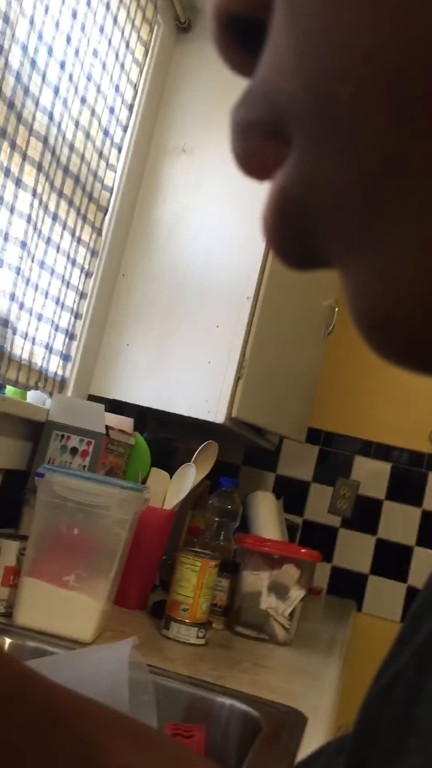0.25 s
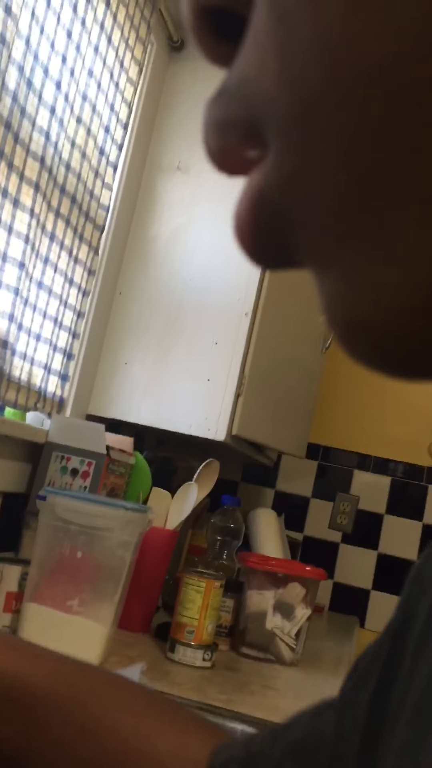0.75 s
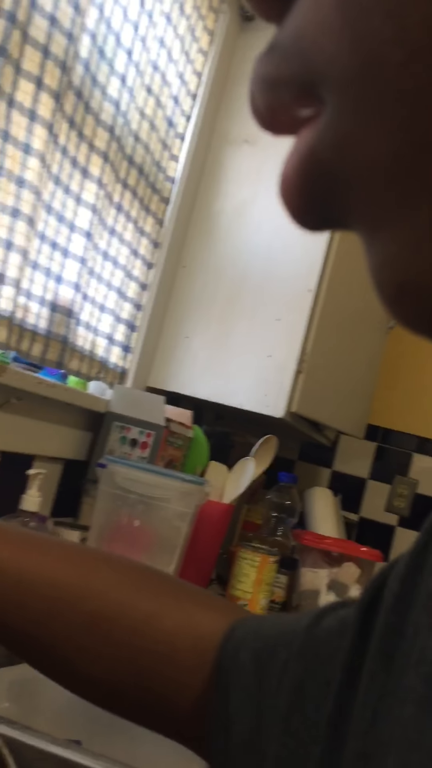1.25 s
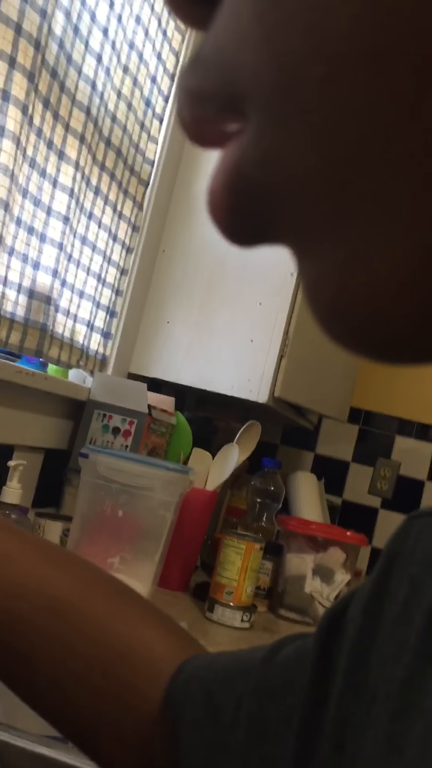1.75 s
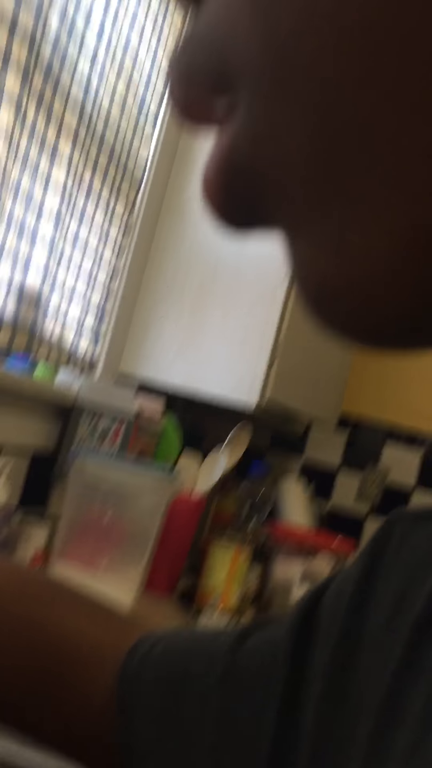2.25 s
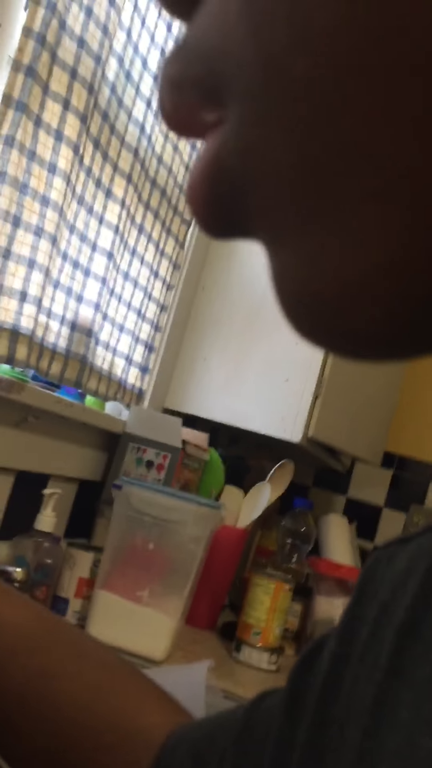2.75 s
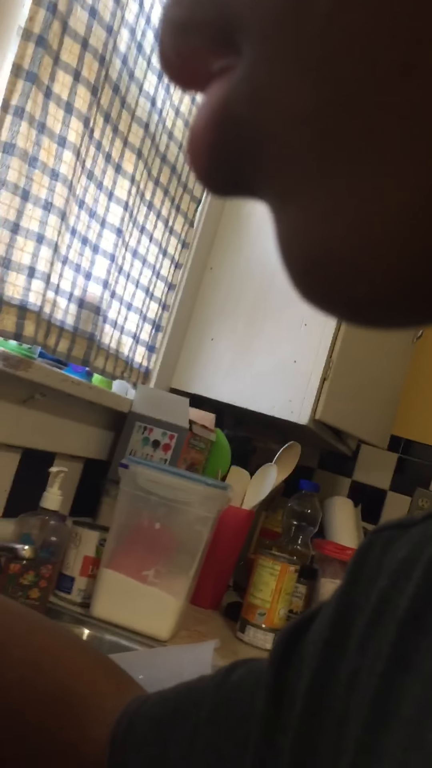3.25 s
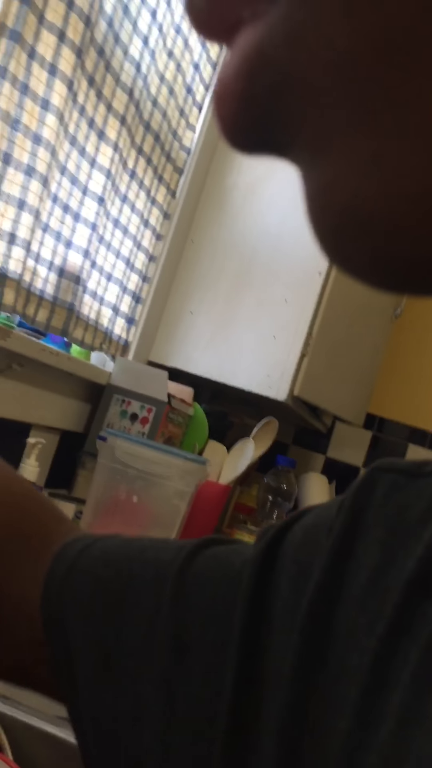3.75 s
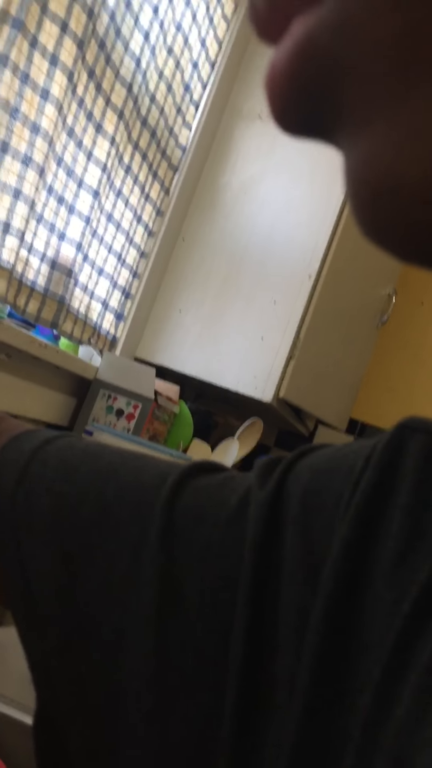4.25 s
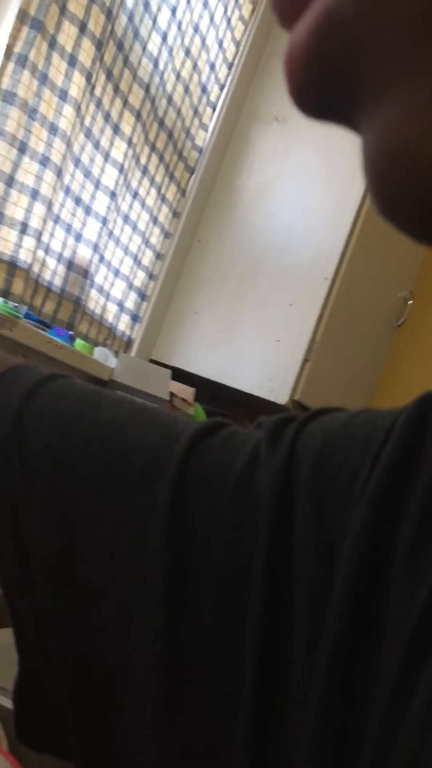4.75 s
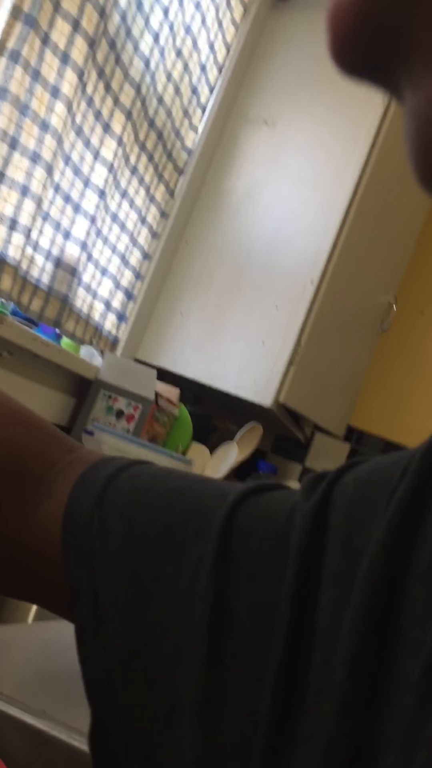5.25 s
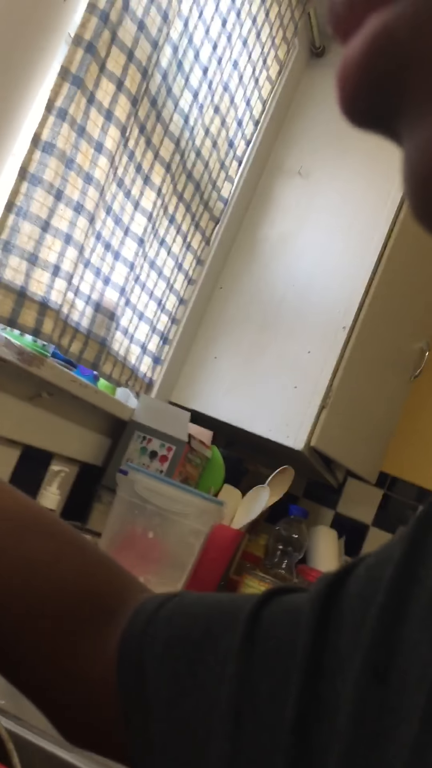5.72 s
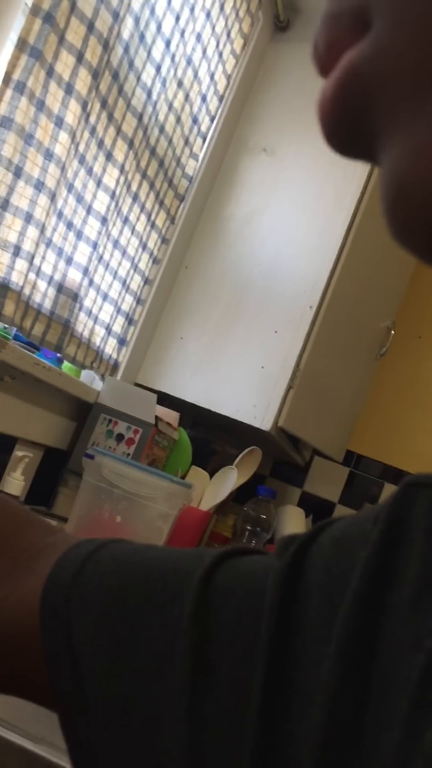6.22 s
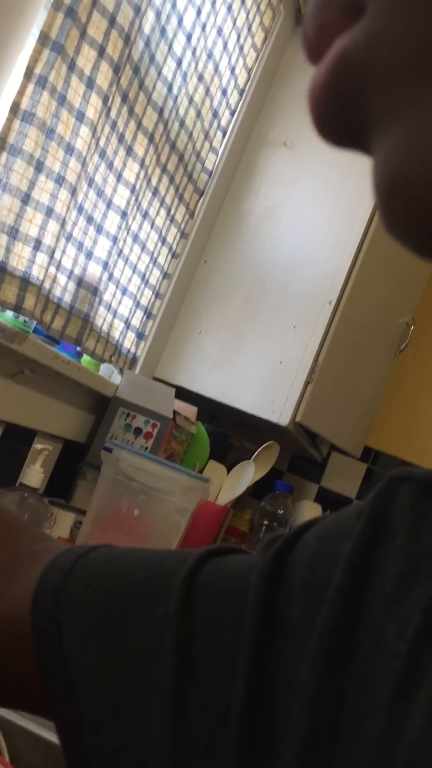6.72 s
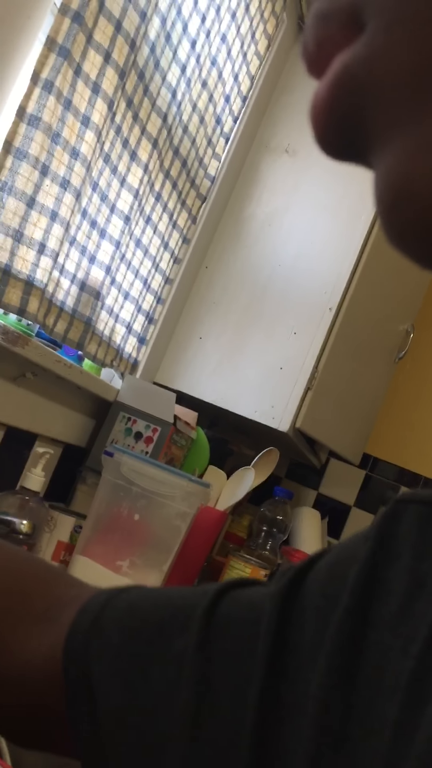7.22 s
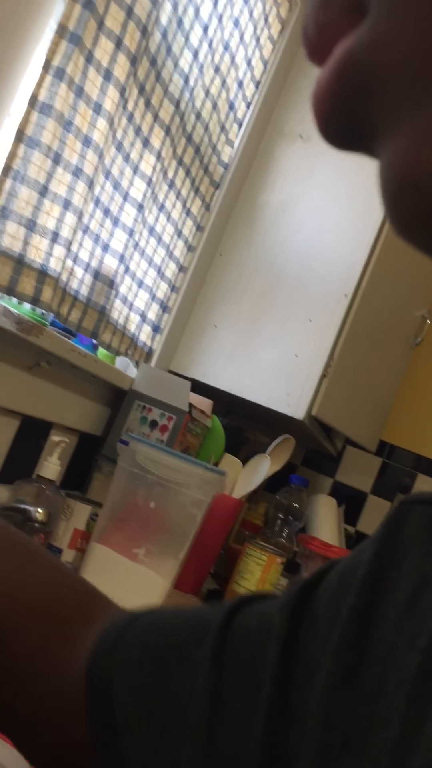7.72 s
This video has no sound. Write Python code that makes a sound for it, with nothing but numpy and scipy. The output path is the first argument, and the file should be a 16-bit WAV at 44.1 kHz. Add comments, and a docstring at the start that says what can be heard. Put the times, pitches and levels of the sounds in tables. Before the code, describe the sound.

Close washing-up sounds: dull taps, hollow bumps, clacks and short scrapes in a metal basin, a loud clang midway, then sparser knocks.

```python
"""At a steel kitchen sink in a small tiled kitchen, heard from close by the washer's shoulder during washing up.
Under it all lie quiet room air, deep worktop thumps, thin brushing, and low jostling with scrapes (filtered noise).
Soft bumps are low damped tones; nudges are flurries of tiny noise grains; taps and knocks are snaps with damped modes.
Clinks ring the cutlery, and one heavy piece drops into the basin, ringing the steel and clattering on it.
All but the air, the brushing, the basin's booms and the thumps gets an echo of fading noise from the kitchen."""
import sys
import numpy as np
from scipy import signal
from scipy.fft import rfft, irfft, next_fast_len
from scipy.io import wavfile
from scipy.ndimage import map_coordinates

SR = 44100
rng = np.random.default_rng(int(sys.argv[2]) if len(sys.argv) > 2 else 0)


def generate_wav(signal):
    """Clip the signal to [-1, 1] and save it as 16-bit WAV at the path in sys.argv[1]."""
    frames = np.transpose(np.atleast_2d(signal))
    scaled = np.clip(frames, -1, 1) * 32767
    pcm = np.round(scaled).astype(np.int16)
    wavfile.write(sys.argv[1], SR, pcm)


N = 351697  # length of the scene [samples]


def amp(db):
    """Turn decibels into a gain."""
    return 10 ** (np.asarray(db) / 20)


def unit(x):
    """Scale x to an average strength (rms) of 1."""
    return x / np.sqrt(np.mean(x ** 2) + 1e-20)


def along(points, hz):
    """Read (frequency, value) points at hz, on a logarithmic frequency axis."""
    point_hz, value = np.transpose(points)
    return np.interp(np.log(hz + 1), np.log(point_hz), value)


def fade(t, t60):
    """A natural dying away: 60 dB down after t60 seconds."""
    return np.exp(-np.log(1000) * t / t60)


def onset(t, rise_s):
    """A quick rounded start, from 0 up towards 1."""
    return 1 - np.exp(-t / rise_s)


def add(track, s, sound):
    """Mix a sound into the track at time s, cut off at the track's end."""
    part = track[max(round(s * SR), 0):][:len(sound)]
    part += sound[:len(part)]


def colour(x, spectrum, size=4096):
    """Filter x to the given spectrum without any sound before its cause (minimum phase)."""
    gain = amp(along(spectrum, np.fft.rfftfreq(size, 1 / SR)))
    cepstrum = irfft(np.log(gain))
    # folding the second half onto the first makes the filter act only forward in time
    cepstrum[1:size // 2] *= 2
    cepstrum[size // 2 + 1:] = 0
    response = irfft(np.exp(rfft(cepstrum)))
    return signal.fftconvolve(x, response)[:len(x)]


def tilted(spectrum, slope_db):
    """Turn a spectrum about its middle point by slope_db an octave."""
    middle_hz = spectrum[len(spectrum) // 2 - 1][0]
    return [(hz, level + slope_db * np.log2(hz / middle_hz)) for hz, level in spectrum]


def wobble(rate, size=N):
    """A smooth random curve with rate random points a second."""
    points = rng.standard_normal(int(size * rate / SR) + 4)
    return map_coordinates(points, [np.arange(size) * rate / SR])


# how long the kitchen's echo lasts: (frequency [Hz], time to fall 60 dB [s])
KITCHEN = [(100, 0.38), (300, 0.19), (800, 0.16), (2000, 0.2), (5000, 0.14), (14000, 0.2)]


def in_kitchen(x, wet_db, build_s=0.00039):
    """Add a fresh room tail: noise in which each frequency dies at its own speed."""
    hz, t, noise = signal.stft(rng.standard_normal(SR // 2), SR, nperseg=256)
    decay = fade(t, along(KITCHEN, hz)[:, None])
    tail = signal.istft(noise * decay * onset(t, build_s), SR)[1]
    response = amp(wet_db) * tail / np.linalg.norm(tail)
    response[0] += 1  # the direct sound
    return signal.fftconvolve(x, response)


def contact(spectrum, snap_t60, ring_db, count, ring_t60=0.064, rise_s=0.0004):
    """One contact: a noise snap plus a cluster of damped tones, rms 1 over its first 12 ms."""
    t = np.arange(SR // 4) / SR
    spaced_hz = np.geomspace(spectrum[1][0], spectrum[-2][0], count)
    hz = spaced_hz * np.exp(rng.normal(0, .05, count))
    modes = rng.choice([-1, 1], count) @ np.sin(2 * np.pi * hz[:, None] * t)
    snap = rng.standard_normal(len(t)) * fade(t, snap_t60)
    ringing = amp(ring_db) * unit(modes) * fade(t, ring_t60)
    sound = colour((snap + ringing) * onset(t, rise_s), spectrum)
    return sound / np.sqrt(np.mean(sound[:SR // 80] ** 2))


def ring(modes, t, t60, reach_hz=np.inf):
    """Ring metal modes at slightly new strengths; a soft blow wakes little above reach_hz."""
    total = 0
    for hz, level in modes:
        strength = amp(level + rng.normal()) / (1 + (hz / reach_hz) ** 2)
        total = total + rng.choice([-1, 1]) * strength * np.sin(2 * np.pi * hz * t)
    return total * fade(t, t60)


# spectrum of the quiet room: (frequency [Hz], level [dB])
AIR = [(22, -31), (58, 9), (140, -8), (250, -0.5), (450, -14), (2700, -23.5), (16000, -34)]


def room_air():
    """The quiet of the room: steady, faint filtered noise."""
    return amp(-60) * unit(colour(rng.standard_normal(N), AIR))


# weight set down shakes the worktop: (time [s], level [dB])
THUMPS = [(4.736, -25.5), (6.099, -39), (6.766, -33.5)]


def worktop(hz=85, t60=0.19, rise_s=0.0022):
    """A short, deep thump of the worktop under the sink: low noise that dies away."""
    track, t = np.zeros(N), np.arange(SR // 3) / SR
    spectrum = [(hz / 3, -25), (hz * 0.72, 0), (hz * 2.0, 0), (hz * 3, -30), (hz * 12, -80)]
    for s, db in THUMPS:
        rumble = unit(colour(rng.standard_normal(len(t)), spectrum))
        add(track, s, amp(db - 0.5) * rumble * fade(t, t60) * onset(t, rise_s))
    return track


def slips(rate, spread_db, smooth_share):
    """Friction: about rate tiny slips a second, uneven in size, over a smooth rub, rms 1."""
    happens = rng.random(N) < rate / SR
    grains = happens * rng.standard_normal(N) * amp(spread_db * rng.standard_normal(N))
    return unit(unit(grains) + smooth_share * rng.standard_normal(N))


# light brushing: (time [s], starting level [dB], time to fall 60 dB [s])
BRUSH = [(0.033, -51.5, 0.96), (6.83, -61.5, 2.1)]
# spectrum of the brushing: (frequency [Hz], level [dB])
HISS = [(2500, -20), (5000, -13.5), (6700, -1.5), (8200, -10), (9700, -8.5), (16000, -15.5)]


def brushing(rise_s=0.002, flutter_db=3):
    """Light sliding makes a thin, fluttering hiss that starts at a touch and dies away."""
    level, t = np.zeros(N), np.arange(2 * SR) / SR
    for s, db, t60 in BRUSH:
        add(level, s, amp(db) * fade(t, t60) * onset(t, rise_s))
    flutter = amp(flutter_db * wobble(26))
    return level * flutter * unit(colour(slips(2500, 2.7, 1.0), HISS))


# spectrum of scraping on a dish: (frequency [Hz], level [dB])
SCRAPE = [(500, -28.5), (1000, 0), (1450, -2.5), (1950, 7.5), (3200, -2), (4250, -1.5), (4900, -12),
          (5600, -5), (9000, -12), (16000, -29)]
# ringing tones of the cutlery: (frequency [Hz], level [dB])
CUTLERY = [(4110, -5.5), (5440, -4), (6780, -2), (7150, -9), (8442, -7)]
CUTLERY_T60 = 0.25  # time to fall 60 dB [s]


def dish(x, t60=0.052, ring_db=-2, cutlery_db=-12, drift=.018, grips_per_s=6, count=140):
    """A rub rings the close tones of a dish and its cutlery, which glide as the grip changes."""
    t = np.arange(SR // 6) / SR
    hz = rng.uniform(SCRAPE[1][0], SCRAPE[-3][0], (count, 1))
    plate = rng.standard_normal(count) @ np.sin(2 * np.pi * hz * t) * fade(t, t60)
    metal = ring(CUTLERY, t, CUTLERY_T60)
    response = amp(ring_db) * plate / np.linalg.norm(plate)
    response += amp(cutlery_db) * metal / np.linalg.norm(metal)
    response[0] += 1  # the rub is also heard directly
    when = np.arange(len(x)) * grips_per_s / SR
    grip = map_coordinates(rng.standard_normal(12), [when], mode="mirror")
    speed = 1 + drift * grip  # reading faster or slower makes the pitch glide
    return map_coordinates(signal.fftconvolve(x, response), [np.cumsum(speed)])


def arch(size, swell):
    """A hand movement swells and fades; a small swell makes it squarer."""
    return np.hanning(size) ** abs(swell)


def pressure(slow_db, fast_db):
    """The gain of a hand that leans in and lets go, sticks and slips."""
    return amp(slow_db * wobble(13) + fast_db * wobble(45))


# the hollow of the jostling moves with the hands: (time [s], pitch [Hz])
HOLLOW = [(0.25, 720), (2.2, 503), (4.3, 454), (7.4, 609)]


def hollow_hz(s):
    """The pitch of the hollow where the hands are at time s."""
    return np.interp(s, *np.transpose(HOLLOW))


# bouts of handling in the basin: (start [s], end [s], jostle level [dB], scrape level [dB])
STROKES = [(0.031, 0.399, -44, -75), (0.174, 0.249, -31.5, -45.5), (0.563, 0.77, -46, -60),
           (1.028, 1.212, -41, -54.5), (1.275, 1.54, -49.5, -61.5), (2.145, 2.475, -41.5, -50.5),
           (2.476, 2.719, -45, -52.5), (2.915, 3.361, -43.5, -53), (3.401, 3.783, -47, -48),
           (3.74, 4.249, -48.5, -50.5), (4.2, 4.439, -49.5, -64), (4.48, 4.849, -45.5, -52),
           (5.121, 5.305, -39, -60), (5.378, 5.728, -50.5, -63.5), (5.923, 6.328, -53.5, -62),
           (6.648, 6.892, -45, -53.5), (7.231, 7.496, -46.5, -52.5)]
# a piece skids to rest over a dish: (time [s], starting level [dB], time to fall 60 dB [s])
SKIDS = [(1.977, -31.5, 0.39), (2.544, -33.5, 0.35), (3.38, -35, 0.31), (3.793, -41, 0.41),
         (5.04, -18, 0.52)]
# spectrum of the jostling before its pitch is moved: (frequency [Hz], level [dB])
JOSTLE = [(25, -32.5), (65, 3), (170, -3.5), (280, 5), (500, 4.5), (720, 0), (1000, -12.5), (1600, -29.5),
          (4000, -67)]


def rubbing(swell=0.13, skid_rise_s=0.0047):
    """Strokes jostle the hollow basin and scrape a dish; a skid starts at once and dies away."""
    jostling, scraping = np.zeros((2, N))
    shoves, catches = slips(240, 0.73, 0.12), slips(400, 4.1, 0.3)
    for start, end, jostle_db, scrape_db in STROKES:
        span = slice(max(round(start * SR), 0), round(end * SR))
        shift = hollow_hz(start) / JOSTLE[4][0]
        moved = [(hz * shift, db) for hz, db in JOSTLE]
        jostle = unit(colour(shoves[span], moved))
        scrape = unit(colour(dish(catches[span]), SCRAPE))
        add(jostling, start, amp(jostle_db) * arch(len(jostle), swell) * jostle)
        add(scraping, start, amp(scrape_db) * arch(len(scrape), swell) * scrape)
    t = np.arange(SR // 2) / SR
    for s, db, t60 in SKIDS:
        scrape = unit(colour(dish(rng.standard_normal(len(t))), SCRAPE))
        add(scraping, s, amp(db) * scrape * fade(t, t60) * onset(t, skid_rise_s))
    both = amp(-3.5) * pressure(slow_db=2.5, fast_db=2.5) * jostling
    both += amp(-3.0) * pressure(slow_db=2.5, fast_db=2.5) * scraping
    return in_kitchen(both, wet_db=-0.5)[:N]


STRAY_SPREAD_DB, STRAY_SPREAD_OCTAVES = 5.5, 0.51  # most that light touches differ, up or down
STRAY_BUMP_DB = 4  # average level of a light touch over the jostle's listed level [dB]


def strays(count):
    """Chance soft touches strewn over the strokes: rows (time [s], level [dB], pitch [Hz])."""
    start, end, jostle_db, _ = np.transpose(STROKES)
    worked_s = np.cumsum(end - start)  # handling time used up by the end of each stroke
    moment = worked_s[-1] * (np.arange(count) + rng.random(count)) / count
    stroke = np.searchsorted(worked_s, moment)
    s = end[stroke] - (worked_s[stroke] - moment)
    luck = rng.uniform(-1, 1, (count, 2))
    luck_db, octaves = (luck * [STRAY_SPREAD_DB, STRAY_SPREAD_OCTAVES]).T
    level_db = jostle_db[stroke] + STRAY_BUMP_DB + luck_db
    return list(zip(s, level_db, hollow_hz(s) * 2 ** octaves))


# soft hollow bumps: (time [s], level [dB], pitch [Hz])
BUMPS = [(0.221, -19, 789), (0.248, -14, 652), (0.295, -16.5, 734), (0.613, -20, 695), (0.734, -27.5, 590),
         (1.059, -29, 446), (1.212, -31, 600), (1.296, -20.5, 643), (1.335, -19.5, 630), (1.516, -23, 652),
         (1.925, -28.5, 593), (2.049, -10, 677), (2.586, -24.5, 535), (3.724, -31, 340),
         (4.734, -10.5, 1076), (5.436, -35, 508), (5.512, -33, 495)]


def bumps(life_cycles=25, rise_s=0.0018, puff_db=-5, waver=0.01, waver_per_s=140):
    """Soft contacts ring one low, damped tone, wavering under the hand, with a dull puff around it."""
    track, t = np.zeros(N), np.arange(SR // 8) / SR
    for s, db, hz in list(BUMPS) + strays(count=44):
        spectrum = [(hz / 10, -14), (hz, 0), (hz * 1.46, -5), (hz * 2.5, -22), (hz * 10, -50)]
        puff = unit(colour(rng.standard_normal(len(t)), spectrum))
        cycles = np.cumsum(hz * (1 + waver * wobble(waver_per_s, size=len(t)))) / SR
        tone = np.sqrt(2) * np.sin(2 * np.pi * cycles)
        body = (tone + amp(puff_db) * puff) * fade(t, life_cycles / hz)
        add(track, s, amp(db) * in_kitchen(body * onset(t, rise_s), wet_db=-6.5))
    return track


# a piece is nudged and shifts a little: (time at the middle [s], level [dB])
NUDGES = [(1.864, -36), (3.129, -42), (3.481, -37.5), (3.976, -51), (4.59, -41.5), (5.795, -53.5),
          (6.392, -42), (6.444, -39), (6.56, -48), (7.02, -45), (7.425, -37)]
# spectrum of a dull tap, shared with the taps below: (frequency [Hz], level [dB])
TAP = [(120, -4), (650, 0.5), (1600, -10), (3600, -14.5), (6500, -26.5), (16000, -50.5)]


def nudges(length_s=.06, slope_db=-1.5):
    """A nudged piece shifts with a brief flurry of tiny, dull contacts."""
    track, flurry, size = np.zeros(N), slips(900, 1.8, 0.46), round(length_s * SR)
    for s, db in NUDGES:
        start = s - length_s / 2
        grains = flurry[round(start * SR):][:size]
        sound = unit(colour(grains, tilted(TAP, slope_db)))
        add(track, start, amp(db) * in_kitchen(sound * np.hanning(size), wet_db=-2.5))
    return track


# dry taps of a piece damped by the hand: (time [s], level [dB])
TAPS = [(0.0527, -25), (0.3275, -28.5), (0.6796, -24.5), (0.844, -34.5), (0.895, -33.5), (0.918, -38.5),
        (1.119, -23.5), (1.134, -30), (1.1495, -25.5), (1.4304, -20), (1.516, -34.5), (1.64, -30.5),
        (2.301, -25.5), (2.3283, -33), (2.785, -32), (3.024, -32), (3.239, -23), (3.5047, -26.5),
        (3.539, -30), (4.1147, -32), (6.054, -31.5), (6.2458, -26.5), (6.304, -43.5), (6.43, -30.5),
        (6.672, -30.5), (6.938, -42)]


def taps(rattle_s=0.035, rattle_db=-9, count=2, stray_db=2):
    """A hand-held piece gives a short, dry tock, then rattles; others come by chance in the strokes."""
    track = np.zeros(N)
    chance = [(s, db + stray_db) for s, db, _ in strays(count=26)]
    for s, db in list(TAPS) + chance:
        touches = [(s, db)]
        for late in rng.random(count):  # a later rattle is softer
            touches.append((s + rattle_s * late, db + rattle_db * (.5 + late)))
        for touch_s, touch_db in touches:
            tock = contact(tilted(TAP, rng.normal()), snap_t60=0.032, ring_db=-11, count=16)
            add(track, touch_s, amp(touch_db - 11.5) * in_kitchen(tock, wet_db=-7.5))
    return track


# metal on metal, leaving the cutlery ringing: (time [s], level [dB])
CLINKS = [(2.0447, -42), (3.3779, -43), (5.067, -27.5), (5.1361, -43)]


def clinks(crack_db=15, crack_t60=0.0048, chatter_per_s=150):
    """Metal on metal: a sharp crack, then cutlery rings thin and high, roughened by its chatter."""
    track, t = np.zeros(N), np.arange(SR) / SR
    for s, db in CLINKS:
        crack = amp(crack_db) * unit(colour(rng.standard_normal(SR), SCRAPE)) * fade(t, crack_t60)
        ringing = ring(CUTLERY, t, CUTLERY_T60) * wobble(chatter_per_s)[:SR]
        add(track, s, amp(db) * in_kitchen(crack + ringing, wet_db=-7))
    return track


# ringing tones of the steel basin: (frequency [Hz], level [dB])
STEEL = [(246, 0), (325, -2), (410, -6), (520, 1.5), (667, -0.5), (997, 1.5), (1032, -3.5), (1352, -7.5),
         (1743, -6.5), (1830, -5.5), (2597, -3), (2860, -8), (3565, -5)]
STEEL_T60 = 0.36  # time to fall 60 dB [s]


def clatter(reach_hz, level_db=-0.5, gap_s=.0045, settle_t60=0.18, damped_t60=.08, detune=.09, count=20):
    """A fallen piece judders to rest; each contact loads the steel into a short, detuned ring."""
    track, t = np.zeros(SR), np.arange(SR // 6) / SR
    for k, (late, load) in enumerate(rng.random((count, 2))):
        s = gap_s * k + gap_s * late * (k > 0)
        stretched_t = t * (1 + detune * (2 * load - 1))  # shifts the pitch up or down
        touch = ring(STEEL, stretched_t, damped_t60, reach_hz)
        add(track, s, amp(level_db) * fade(s, settle_t60) * touch)
    return track


# heavy blows that set the steel ringing: (time [s], level [dB], reach [Hz])
CLANGS = [(5.041, -21, 5010), (5.067, -31.5, 11900)]
# pushes that make the basin floor boom: (time [s], level [dB])
BOOMS = [(5.963, -30), (6.104, -29), (6.767, -28.5), (7.444, -30)]


def steel(boom_hz=248, boom_t60=0.26, boom_rise_s=0.00094, shudder_per_s=110):
    """Heavy blows ring the steel and a fallen piece clatters on it; pushes sound one low boom."""
    track, t = np.zeros(N), np.arange(SR) / SR
    for s, db, reach_hz in CLANGS:
        shudder = 1 + .5 * wobble(shudder_per_s, size=SR)
        clang = ring(STEEL, t, STEEL_T60, reach_hz) * shudder
        add(track, s, amp(db) * in_kitchen(clang + clatter(reach_hz), wet_db=-10.5))
    for s, db in BOOMS:
        boom = np.sin(2 * np.pi * boom_hz * t) * fade(t, boom_t60)
        add(track, s, amp(db) * boom * onset(t, boom_rise_s))
    return track


REBOUND_S, REBOUND_DB = .011, -19.5  # typical first flight, level change at each rebound
REBOUND_SHRINK = 0.63  # typical next flight as a share of the last


def chatter(s, db, unevenness=0.34, count=2):
    """A piece lands and rebounds: rows (time [s], level [dB]) of its touches."""
    uneven = np.exp(unevenness * rng.standard_normal(count))
    flights = np.cumsum(REBOUND_S * REBOUND_SHRINK ** np.arange(count) * uneven)
    rebounds = [(s + flight, db + REBOUND_DB * (k + 1)) for k, flight in enumerate(flights)]
    return [(s, db)] + rebounds


# hard contacts of cutlery and dishes:
# (time [s], level [dB], weight: thud's relative level [dB], hardness: tick's relative level [dB])
KNOCKS = [(0.1993, -28.5, -10, -13), (0.3129, -32.5, -2, -15.5), (0.6087, -23, -1.5, -16.5),
          (1.1076, -22.5, -6, -20.5), (1.3158, -26.5, 0, -21), (1.8443, -27.5, 4, -17),
          (1.9764, -20.5, 2.5, -22.5), (1.9844, -15.5, -5, -15.5), (2.0456, -5, -16, -14.5),
          (2.2747, -25.5, -2.5, -15.5), (2.375, -29.5, 0, -18), (2.5419, -25, -1.5, -16.5),
          (2.9222, -32.5, 2, -11), (2.948, -19, -10.5, -14.5), (2.99, -25.5, -6, -14.5),
          (3.263, -27, -3, -8.5), (3.296, -25.5, -14, -18.5), (3.3806, -20, -6.5, -17),
          (3.7924, -22, -5.5, -20), (4.498, -26, -1, -19), (4.517, -24.5, -20, -11.5),
          (4.737, -19, -5, -15.5), (5.0385, -6.5, -11, -24), (5.0642, -13, 0, -8),
          (5.1344, -12, -14, -14.5), (5.2443, -27.5, 0, -13.5), (5.2785, -28, -1.5, -18.5),
          (5.9397, -35.5, 0.5, -15.5), (5.9582, -28, -4, -15.5), (6.0652, -29, -5.5, -16),
          (6.102, -23, -2.5, -20.5), (6.7404, -33.5, 8.5, -11), (6.764, -13.5, -11.5, -25),
          (6.8297, -29.5, -7.5, -10), (7.2624, -26, 5, -23), (7.274, -13, -8.5, -19), (7.435, -30, -2, -4),
          (7.9417, -21.5, 0, -15)]
# spectra of the basin's thud, the dish's clack and the hard edge's tick: (frequency [Hz], level [dB])
THUD = [(40, -19.5), (70, -9.5), (125, -16.5), (190, -10.5), (290, -4.5), (650, -1.5), (1000, -11),
        (1800, -23), (5000, -50.5)]
CLACK = [(300, -41.5), (700, -8.5), (1100, -4), (2200, -0.5), (4200, -5.5), (5500, -10.5), (9000, -24.5),
         (16000, -58)]
TICK = [(1500, -35.5), (3200, -16), (4500, -2), (8500, -5), (10500, -11), (16000, -14)]


def knocks(brightening=1.0, usual_hardness_db=-18, steel_db=-20.5):
    """Each contact thuds on the basin, clacks in the dish and ticks at the hard edge."""
    track = np.zeros(N)
    for s, db, weight_db, hardness_db in KNOCKS:
        # a harder contact is brighter
        slope_db = brightening * (hardness_db - usual_hardness_db)
        thud = amp(-6.0) * contact(THUD, snap_t60=0.12, ring_db=-4.5, count=16, rise_s=0.0013)
        t = np.arange(len(thud)) / SR
        thud += amp(steel_db) * ring(STEEL, t, STEEL_T60, reach_hz=1063)  # the thud wakes the steel a little
        clack = contact(tilted(CLACK, slope_db), snap_t60=0.014, ring_db=-18.5, count=32, rise_s=0.00072)
        clack *= amp(-13.5)
        tick = amp(-8.5) * contact(tilted(TICK, slope_db / 2), snap_t60=0.052, ring_db=-10.5, count=32)
        sound = in_kitchen(amp(weight_db) * thud + clack + amp(hardness_db) * tick, wet_db=-4.5)
        for touch_s, touch_db in chatter(s, db):
            add(track, touch_s, amp(touch_db) * sound)
    return track


def scene():
    """All the sounds at the sink over the quiet of the room."""
    background = room_air() + worktop() + brushing()
    handling = rubbing() + bumps() + nudges()
    contacts = taps() + clinks() + steel() + knocks()
    return (background + handling + contacts)[None]


TOP_HZ = 16050  # upper band limit [Hz]


def record(dry, low_hz=48):
    """The microphone sheds the deep bass and keeps almost nothing above its band limit."""
    size = next_fast_len(N + SR // 2)
    high_pass = signal.butter(2, low_hz, "high", fs=SR, output="sos")
    heard = signal.sosfilt(high_pass, dry)
    band = 1 / (1 + (np.fft.rfftfreq(size, 1 / SR) / TOP_HZ) ** 200)  # a very steep cut
    return irfft(rfft(heard, size) * band, size)[..., :N]


dry = scene()
out = record(dry)
generate_wav(out)
```